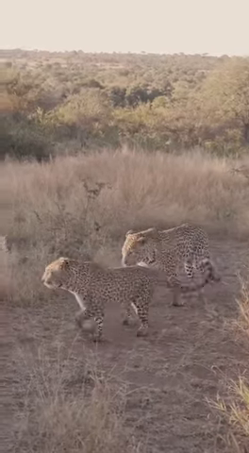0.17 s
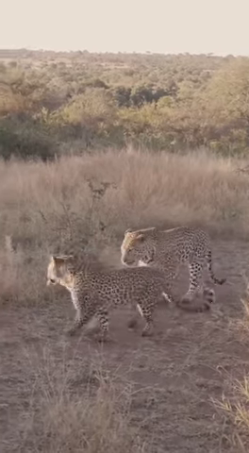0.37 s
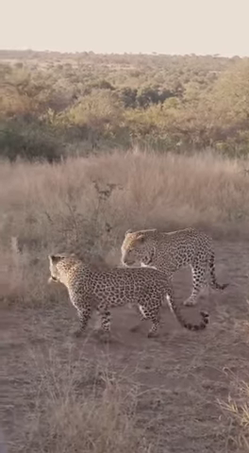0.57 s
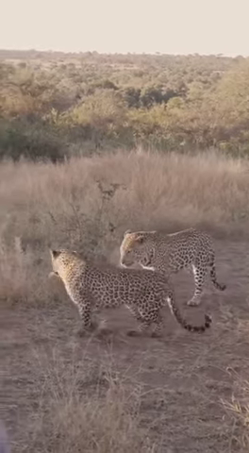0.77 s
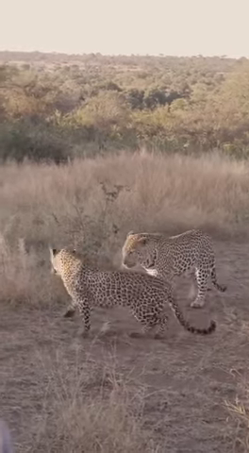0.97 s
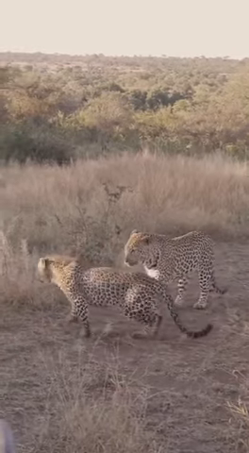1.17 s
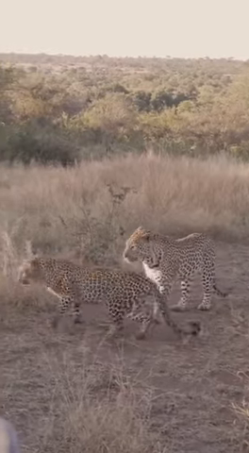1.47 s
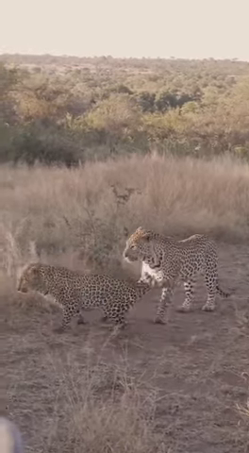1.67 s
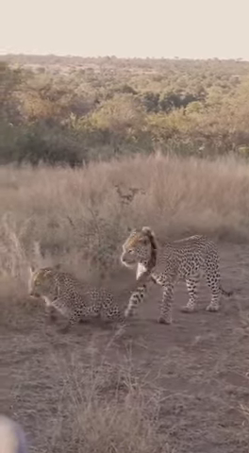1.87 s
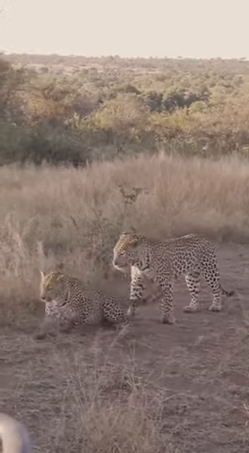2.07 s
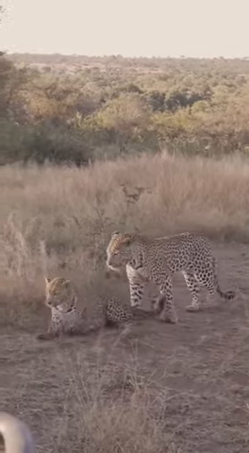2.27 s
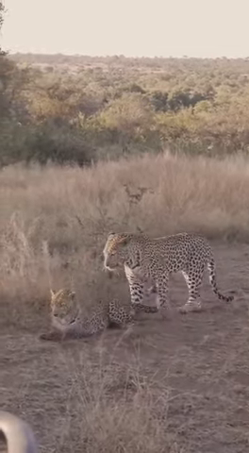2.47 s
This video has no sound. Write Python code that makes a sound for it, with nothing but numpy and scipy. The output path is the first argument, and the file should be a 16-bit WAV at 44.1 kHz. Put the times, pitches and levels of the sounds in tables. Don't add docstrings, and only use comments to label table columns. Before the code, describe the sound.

A leopard growls in slow, low, separate throaty pulses on open grassland while distant birds chirp.

```python
import sys
import numpy as np
from scipy import signal
from scipy.fft import rfft, irfft
from scipy.io import wavfile
from scipy.ndimage import uniform_filter1d

SR = 44100
rng = np.random.default_rng(int(sys.argv[2]) if len(sys.argv) > 2 else 0)


def transcribe(signal):
    frames = np.atleast_2d(signal).T
    limited = np.clip(frames, -1, 1)
    pcm = np.round(limited * 32767).astype(np.int16)
    wavfile.write(sys.argv[1], SR, pcm)


def magnitude_from_level(level_db):
    exponent = np.asarray(level_db, float) / 20
    return 10 ** exponent


N = 115542
T = np.arange(N) / SR

# frequency in Hz, density in dB per Hz.
PLAIN_COLOUR = [(60, 7), (200, -1.5), (320, -3.5), (700, -2), (1100, -8), (3300, -12), (4900, -27),
                (13000, -32)]
# time in seconds, level in dB.
WIND_GUSTS = [(0, -33), (.12, -32), (.23, -39), (.41, -39), (.7, -41), (.86, -38), (.93, -37),
              (1.01, -44.5), (1.3, -36.5), (1.39, -31.5), (1.47, -40), (1.69, -41), (2.17, -37),
              (2.28, -41.5), (2.44, -41), (2.5, -25.5), (2.62, -23)]
# start in seconds, length in seconds, centre in Hz, width in Hz, level in dB.
GRASS_TICKS = [(0.735, 0.04, 4500, 1400, -54.5), (1.3, 0.032, 3000, 9000, -66),
               (1.535, 0.04, 4900, 11900, -58.5), (1.29, 0.3, 1900, 1500, -48.5),
               (1.09, .16, 2240, 1500, -49), (1.33, 0.23, 4200, 660, -58.5), (1.25, 0.23, 2980, 740, -53.5),
               (1.52, .25, 1900, 1700, -50.5), (1.5, 0.24, 3240, 870, -56.5), (.4, 0.25, 3490, 730, -54),
               (1.6, .07, 8800, 11000, -65), (1.844, 0.0085, 1100, 590, -37), (1.4, 0.0137, 600, 180, -40),
               (1.113, 0.014, 1400, 330, -45.5), (1.145, 0.034, 2000, 1000, -44),
               (1.153, .012, 1330, 290, -44), (1.165, .016, 1300, 250, -41),
               (1.188, .018, 1270, 230, -45.5), (2.452, 0.048, 4740, 1100, -55.5)]
# time in seconds, pitch in Hz, level in dB.
WHISTLE_CALL = [
    (0.81, 1847, -55.5),
    (0.914, 1804, -45.5),
    (0.956, 1801, -37),
    (1.014, 1781, -37),
    (1.034, 1822, -33.5),
    (1.07, 2092, -50),
    (1.102, 2198, -54),
    (1.12, 2178, -58),
]
# time in seconds, pitch in Hz, level in dB.
GLIDE_CALL = [
    (1.165, 5380, -65),
    (1.22, 4840, -71),
    (1.255, 4370, -70),
    (1.266, 4370, -50.5),
    (1.311, 4054, -44.5),
    (1.35, 4027, -50.5),
    (1.398, 3910, -53.5),
    (1.432, 3920, -69),
]
# start in seconds, length in seconds, first Hz, last Hz, level in dB.
CHIRPS_FIRST = [(0.418, 0.043, 3450, 3870, -55), (.062, 0.026, 5150, 4700, -69),
                (0.046, 0.0546, 2650, 2290, -52), (0.079, 0.058, 3640, 3780, -59),
                (0.227, 0.075, 5230, 4930, -73), (0.255, 0.091, 3290, 3700, -54.5),
                (0.358, 0.05, 5030, 5260, -69), (0.391, 0.03, 2120, 2360, -48.5),
                (0.421, 0.14, 3200, 3405, -53), (.455, 0.057, 3700, 3670, -49.5),
                (0.483, 0.077, 2273, 2380, -45.5), (0.56, 0.031, 2526, 2600, -44.5),
                (0.576, 0.059, 3640, 3880, -54), (.74, 0.063, 3083, 3200, -54),
                (0.751, 0.04, 3600, 3950, -55.5), (0.777, .04, 1840, 2360, -52),
                (0.808, 0.037, 1600, 1588, -54), (.875, 0.015, 2260, 2230, -51),
                (0.919, .036, 2110, 2387, -44), (.952, .06, 3400, 4090, -56),
                (.965, 0.035, 3430, 3490, -52.5)]
CHIRPS_LATER = [(1.061, 0.025, 3260, 3200, -50.5), (1.095, 0.035, 3423, 3490, -52.5),
                (1.20, 0.051, 3270, 4000, -50.5), (1.318, 0.052, 1616, 1720, -54),
                (1.56, 0.071, 1750, 2305, -45.5), (1.6, .095, 3090, 3450, -51),
                (1.60, .12, 1268, 1314, -46.5), (1.615, 0.051, 5020, 5320, -65),
                (1.668, 0.21, 2696, 2655, -50.5), (1.7, .11, 3170, 3120, -53.5),
                (1.949, 0.06, 2710, 2940, -52), (2.395, 0.045, 3290, 3070, -49),
                (2.44, 0.023, 3050, 2950, -58), (2.49, 0.023, 3193, 3390, -53.5),
                (1.53, 0.051, 3400, 2985, -49.5), (1.55, 0.038, 1590, 1590, -46),
                (1.701, 0.0427, 1974, 1550, -49.5), (2.13, 0.055, 3760, 3490, -55),
                (2.089, 0.027, 3240, 3336, -51.5)]
CHIRPS_EXTRA = [
    (.025, .035, 5250, 5300, -68),
    (0, 0.0293, 3200, 2850, -60),
    (0.3, .018, 1400, 1650, -52),
    (.957, 0.028, 2450, 2550, -55),
    (0.1, .05, 3180, 3280, -56),
    (1.175, .04, 2800, 3120, -58),
    (1, .03, 3380, 3500, -57),
    (2, 0.026, 3000, 2800, -53),
    (1.57, .08, 2950, 3050, -60),
    (2.32, 0.027, 1300, 1400, -56),
]
# time in seconds, peak in dB.
GROWL_FLAPS = [(0.0453, -14), (0.0865, -15.5), (0.1392, -17), (0.1959, -17), (0.2562, -19), (0.3227, -22.5),
               (0.3761, -18.9), (0.4288, -16), (0.4572, -17), (0.4896, -13.5), (0.5152, -19.5),
               (0.5431, -16.5), (0.6096, -19.5), (0.6662, -20), (0.7177, -15.5), (0.7453, -25.5),
               (0.7676, -17), (0.7958, -22.5), (0.823, -19), (0.8678, -29.5), (0.8907, -21), (0.9533, -22),
               (1.0857, -30), (1.3534, -17), (1.41, -33), (1.5273, -28), (1.5807, -17.5), (1.6031, -19.3),
               (1.6194, -17), (1.6537, -15), (1.706, -12.5), (1.7571, -19.5), (1.8007, -27),
               (1.8176, -15.5), (1.8485, -20), (1.8607, -13.4), (1.9031, -13.4), (1.952, -16),
               (2.0059, -18), (2.0528, -18.5), (2.0974, -26.5), (2.1191, -17.5), (2.154, -15),
               (2.2027, -21.5), (2.2445, -15), (2.3152, -36), (2.3793, -16), (2.4246, -11.5), (2.48, -14.9),
               (2.5281, -12.4), (2.5817, -12)]
# time in seconds, peak in dB.
SURGE_FLAP = [
    (1.5568, -13),
]
# time in seconds, peak in dB.
GRUNT_FLAPS = [
    (1.132, -21),
    (1.156, -14.5),
    (1.168, -19.5),
    (1.190, -17.5),
]
# time in seconds, peak in dB.
SNAP_FLAP = [
    (1.19, -26),
]
# frequency in Hz, level in dB, 60 dB decay time in seconds.
GROWL_THROAT = [(175, 0, .05), (73, -11.5, .074), (200, -12, .038)]
SURGE_RESONANCES = [(187, 0, .029), (75, -18, .05), (280, -22, .03)]
GRUNT_RESONANCES = [(78, -4.5, 0.057), (161, -1.5, 0.032), (325, -26.5, 0.051)]
SNAP_RESONANCE = [(328, 0.22, 0.04)]


def level(x, db):
    return x * magnitude_from_level(db) / np.sqrt(np.mean(x ** 2))


def band(hz, width_hz, size=N):
    b, a = signal.iirpeak(min(hz, .45 * SR), hz / width_hz, fs=SR)
    noise = rng.standard_normal(size + 4096)
    settled = signal.lfilter(b, a, signal.lfilter(b, a, noise))[4096:]
    return level(settled, 0)


def walk(rate_hz):
    hold = int(SR / rate_hz)
    steps = np.repeat(rng.standard_normal(N // hold + 1), hold)
    return 1.3 * uniform_filter1d(uniform_filter1d(steps, hold), hold)[:N]


def add(out, at_s, x):
    i = max(int(at_s * SR), 0)
    out[i:i + len(x)] += x[:N - i]


def plain():
    level_db, flicker_db = -45, 0.62
    log_hz = np.log(np.arange(N // 2 + 1) * SR / N + 1)
    colour = np.array(PLAIN_COLOUR)
    noise = rfft(rng.standard_normal(N)) * magnitude_from_level(np.interp(log_hz, np.log(colour[:, 0]), colour[:, 1]))
    out = 0
    for k in range(19):
        share = np.clip(1 - np.abs((log_hz - np.log(30)) * 3 - k), 0, 1)
        out = out + magnitude_from_level(flicker_db * walk(16)) * irfft(noise * share, N)
    return level(out, level_db)


def wind():
    gust = magnitude_from_level(np.interp(T, *np.array(WIND_GUSTS).T))
    swings = band(11.7, 10.3)
    buffet = magnitude_from_level(-9 + 3.6 * walk(4.91)) * band(44.6, 44.0)
    return gust * (swings + buffet)


def grass():
    out = np.zeros(N)
    for at, length, hz, width_hz, db in GRASS_TICKS:
        n = int(length * SR)
        burst = band(hz, width_hz, size=16384)[:n]
        add(out, at, level(burst, db) * np.hanning(n))
    return out


def chatter():
    low_hz, high_hz, length_s, level_db, spread_db = 1600, 3800, .025, -62, 1.5
    even, normal = rng.random(size=(90, 3)), rng.standard_normal(size=(90, 2))
    start_s = even[:, 0] * T[-1]
    hz = low_hz + (high_hz - low_hz) * even[:, 1]
    last_hz = hz * (1 + .07 * normal[:, 0])
    return list(np.c_[start_s, length_s * (.4 + even[:, 2]), hz, last_hz, level_db + spread_db * normal[:, 1]])


def long_call(out, call):
    start_s = call[0, 0]
    t = T[:int((call[-1, 0] - start_s) * SR)]
    edge = np.clip(np.minimum(t, t[-1] - t) / 0.006, 0, 1)
    hz = np.interp(t + start_s, call[:, 0], call[:, 1])
    db = np.interp(t + start_s, call[:, 0], call[:, 2])
    add(out, start_s, np.sqrt(2) * magnitude_from_level(db) * edge * np.sin(2 * np.pi * np.cumsum(hz) / SR))


def chirps(out):
    bend, steady_s = .05, 0.0552
    warble, waver_db = .014 * walk(110), 2.6 * walk(130)
    for at, length, hz0, hz1, db in CHIRPS_FIRST + CHIRPS_LATER + CHIRPS_EXTRA + chatter():
        i = int(at * SR)
        u = np.linspace(0, 1, int(length * SR))[:N - i]
        span = slice(i, i + len(u))
        sweep = hz0 + (hz1 - hz0) * (u - bend * np.sin(2 * np.pi * u))
        hz = sweep * (1 + warble[span] * min(1, (steady_s / length) ** 2))
        gain = np.sqrt(2) * magnitude_from_level(db + waver_db[span] * min(1, steady_s / length))
        envelope = np.abs(np.sin(np.pi * u)) ** 0.18
        add(out, at, gain * envelope * np.sin(2 * np.pi * np.cumsum(hz) / SR))


def birds():
    echo_db, near_echo_db, echo_s = -6, -9, .06
    out = np.zeros(N)
    long_call(out, np.array(WHISTLE_CALL))
    long_call(out, np.array(GLIDE_CALL))
    near = out.copy()
    chirps(out)
    tail = rng.standard_normal(SR // 4) * np.exp(-T[:SR // 4] / echo_s)
    tail = tail / np.sqrt(np.sum(tail ** 2))
    echo_feed = out - (1 - magnitude_from_level(near_echo_db)) * near
    return out + magnitude_from_level(echo_db) * signal.fftconvolve(echo_feed, tail)[:N]


def breath(voice, hz, width_hz, t60, db):
    pole = 1000. ** (-2 / (t60 * SR))
    swell = np.sqrt(signal.lfilter([1 - pole], [1, -pole], voice ** 2))
    return level(swell * band(hz, width_hz), db)


def flaps(rows, throat, late_s, rise_s, closing):
    scatter_db, detune, ring_spread = 1.5, .012, .12
    out, t = np.zeros(N), T[:SR // 5]
    for (at, db), chance in zip(rows, rng.standard_normal((len(rows), 8))):
        ring = 0
        for k, (hz, mode_db, t60) in enumerate(throat):
            gain = magnitude_from_level(mode_db) if k == 0 else -magnitude_from_level(mode_db + scatter_db * chance[k])
            tone = np.sin(2 * np.pi * hz * (1 + detune * chance[k + 4]) * t)
            decay = 1000. ** -((t / (t60 * np.exp(ring_spread * chance[3]))) ** closing)
            ring = ring + gain * tone * decay
        add(out, at + late_s, magnitude_from_level(db) * ring * (1 - np.exp(-t / rise_s)))
    return out


def growls():
    steady = flaps(GROWL_FLAPS, GROWL_THROAT, late_s=0, rise_s=.0006, closing=1.2)
    surge = flaps(SURGE_FLAP, SURGE_RESONANCES, late_s=0, rise_s=.0006, closing=3)
    return steady + surge


def grunt():
    slack = dict(late_s=.003, rise_s=.0018, closing=1.6)
    return flaps(GRUNT_FLAPS, GRUNT_RESONANCES, **slack) - flaps(SNAP_FLAP, SNAP_RESONANCE, **slack)


def cat():
    voice = growls() + grunt()
    murmur = breath(voice, hz=162, width_hz=83, t60=0.1, db=-47)
    chest = breath(voice, hz=59.6, width_hz=63, t60=0.24, db=-44)
    return voice + murmur + chest


def scene():
    return (plain() + wind() + grass() + birds() + cat())[None]


def band_limit(x):
    return signal.sosfilt(signal.butter(12, 12990, fs=SR, output="sos"), x)


def record(dry):
    mix = dry * np.clip((T[-1] - T) / .004, 0, 1)
    return band_limit(mix)


dry = scene()
out = record(dry)
transcribe(out)
```